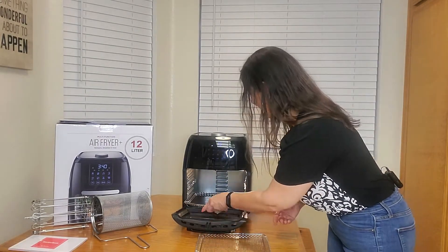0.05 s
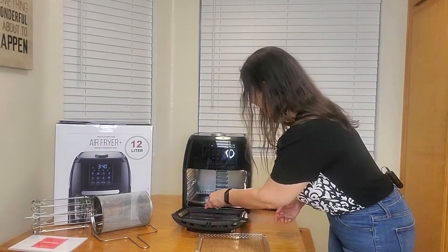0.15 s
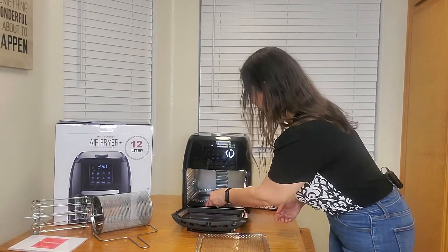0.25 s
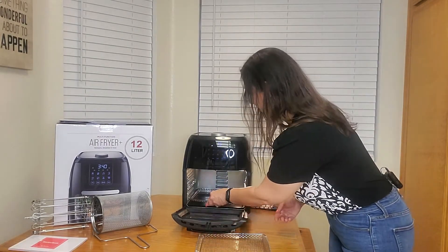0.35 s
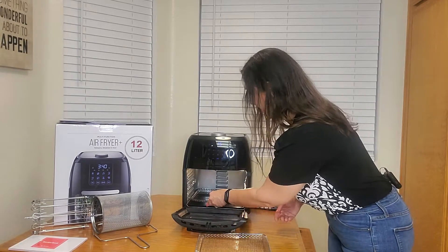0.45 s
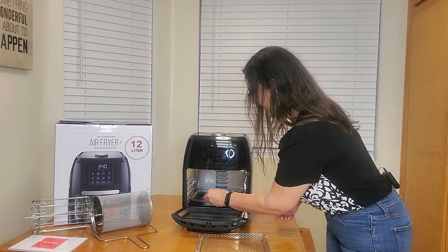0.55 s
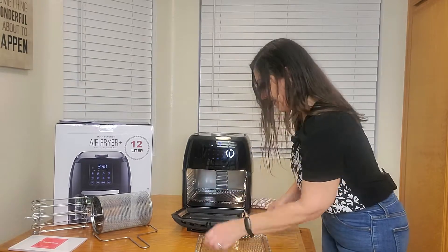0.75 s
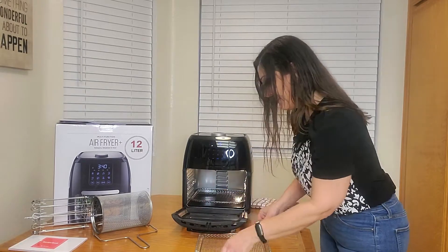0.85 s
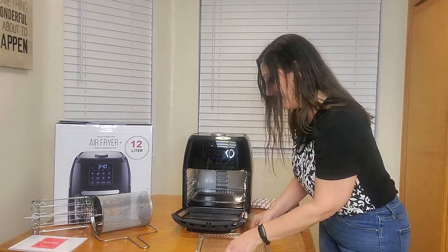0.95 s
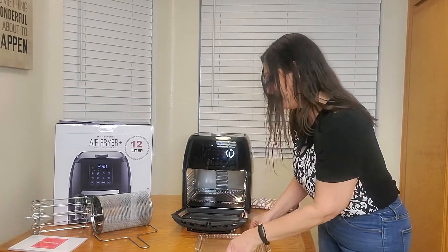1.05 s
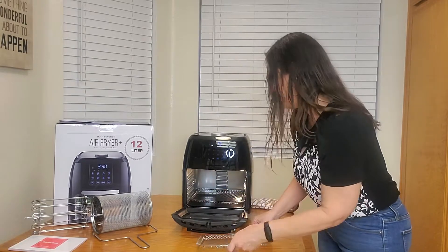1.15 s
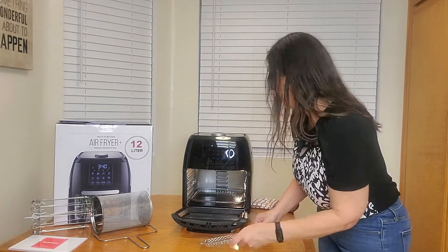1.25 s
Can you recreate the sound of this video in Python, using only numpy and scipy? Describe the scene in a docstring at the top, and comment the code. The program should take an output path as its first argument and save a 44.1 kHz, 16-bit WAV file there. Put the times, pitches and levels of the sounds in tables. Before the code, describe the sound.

A wire rack scrapes and ticks along the rails of a countertop oven, hits the back with a loud metallic bang, and settles; then a second rack bumps quietly on a wooden table in a lively kitchen.

```python
"""A wire mesh rack scrapes along the rails of a small countertop oven, bangs against the back and settles.
A second rack is then nudged and dragged over a wooden table. Uneven stick-slip clicks and single blows
excite the resonances of oven, wires and table; groans are unsteady sines.
A lively kitchen rings on over a faint mains hum and a noise floor."""
import sys
import numpy as np
from scipy import signal
from scipy.fft import rfft, irfft
from scipy.io import wavfile

SR = 44100
rng = np.random.default_rng(int(sys.argv[2]) if len(sys.argv) > 2 else 0)


def int16_out(signal):
    """Quantize to a 16-bit WAV file."""
    q = np.round(np.clip(np.atleast_2d(signal).T, -1, 1) * 32767)
    wavfile.write(sys.argv[1], SR, q.astype(np.int16))


N = 57330

# separate modes of the oven cavity and shell: (frequency [Hz], level [dB], T60 [s])
OVEN_MODES = [(194, 3.5, 0.068), (341, -2.5, 0.11), (378.8, -6, 0.21), (455, -1, 0.13), (547, -3, 0.13),
              (625, -19, 0.68), (639.7, 6, 0.098), (784.5, -5, 0.28), (924, -8, 0.14), (1017, -0.5, 0.069),
              (1219, -9.5, 0.074)]
# separate modes of the rack wires: (frequency [Hz], level [dB], T60 [s])
WIRE_MODES = [(1256, 5, 0.21), (1524, -3, 0.2), (1755, 3, 0.15), (2146, -2.5, 0.16), (2480, 0, 0.047),
              (3358, 0.5, 0.034), (4170, 4.5, 0.07), (4266, 6.5, 0.039), (4980, 1.5, 0.12)]
# spectrum of the oven shell's dense resonances: (frequency [Hz], level [dB])
SHELL_SPECTRUM = [(80, -22.5), (120, 6.5), (180, 9.5), (320, 0.5), (620, 2.5), (850, 2.5), (1300, -11.5),
                  (5000, -43)]
SHELL_T60_S = 0.02


def amp(db):
    """Amplitude factor of a level in dB."""
    return 10 ** (np.asarray(db) / 20)


def unit(h):
    """An impulse response scaled to unit energy."""
    return h / np.sqrt(np.sum(h ** 2))


def through(x, h):
    """Sound x rung through the response h."""
    return signal.fftconvolve(x, h)[:N]


def colour(x, points):
    """Causal filter with the spectral shape of (Hz, dB) points; its overall gain is arbitrary."""
    hz, db = np.array(points).T
    f = np.maximum(np.fft.rfftfreq(N, 1 / SR), 1)
    log_gain = np.log(amp(np.interp(np.log(f), np.log(hz), db)))
    cepstrum = irfft(log_gain, N)
    response = np.exp(2 * rfft(cepstrum[:N // 2], N))  # causal half only: minimum phase
    return irfft(rfft(x) * response, N)


def noise(points):
    """Coloured noise of rms 1."""
    y = colour(rng.standard_normal(N), points)
    return y / y.std()


def fade(t60_s):
    """Exponential decay by 60 dB in t60_s."""
    return np.exp(-np.log(1000) * np.arange(N) / SR / max(t60_s, 1e-3))


def modes(mode_table):
    """Ring of a struck object's separate modes; neighbours swing in opposite directions."""
    t = np.arange(N) / SR
    ring = np.zeros(N)
    for k, (hz, db, t60_s) in enumerate(mode_table):
        ring += (-1) ** k * amp(db) * fade(t60_s) * np.sin(2 * np.pi * hz * t)
    return unit(ring)


def burst(points, t60_s):
    """Short ring of many close resonances: decaying coloured noise."""
    return unit(colour(rng.standard_normal(N) * fade(t60_s), points))


def push(at_s, db, contact_ms=0):
    """One contact force pulse; a longer one is duller."""
    x = np.zeros(N)
    x[int(max(at_s, 0) * SR)] = amp(db)
    pulse = np.hanning(int(abs(contact_ms) * SR / 1000) + 3)
    return through(x, pulse / pulse.sum())


def slips(curve, per_s, scatter_db, column):
    """Uneven stick-slip clicks whose level follows one column of a curve, silent outside it."""
    rows = np.array(curve).T
    gap = 2 * rng.random(N // 4)  # mean 1
    size = np.clip(rng.standard_normal(N // 4), -2, 2)
    sign = rng.choice([-1, 1], N // 4)
    at = (np.cumsum(gap) * SR / per_s).astype(int)
    inside = at < N
    x = np.zeros(N)
    x[at[inside]] = (amp(scatter_db * size) * sign)[inside]
    level_db = np.interp(np.arange(N) / SR, rows[0], rows[column], left=-np.inf, right=-np.inf)
    return x / x.std() * amp(level_db)


def sliding(count=11):
    """The rack judders against the oven's body while wires of differing pitch scrape the rail in turn."""
    # rack sliding in: (time [s], oven body level [dB], wire scrape level [dB])
    slide = [(0.0, -26.5, -35), (0.063, -41.5, -50), (0.082, -32.5, -40.5), (0.094, -33.5, -37),
             (0.15, -36, -40), (0.199, -34.5, -37), (0.206, -38.5, -28.5), (0.237, -36, -26),
             (0.263, -28.5, -35), (0.306, -27.5, -35.5), (0.322, -23, -33), (0.342, -32.5, -47),
             (0.35, -26, -34), (0.382, -29.5, -42), (0.396, -30, -37)]
    # spectrum of the mesh's dense resonances: (frequency [Hz], level [dB])
    mesh_spectrum = [(400, -9), (1100, 6), (2000, 1.5), (4400, -2), (6400, -11.5), (7800, -10),
                     (12000, -22), (15500, -39.5)]
    judders_per_s, scrapes_per_s = 600, 1100
    wire_spread = 0.03  # pitch, +- fraction
    t, cavity, out = np.arange(N) / SR, modes(OVEN_MODES), 0
    passes_s, step_s = np.linspace(0, slide[-1][0], count, retstep=True)
    stretches = 1 + wire_spread * rng.uniform(-1, 1, count)
    for at_s, stretch in zip(passes_s, stretches):
        touch = np.sqrt(np.clip(1 - np.abs(t - at_s) / step_s, 0, 1))  # crossfade between wires
        body = unit(cavity + amp(7.5) * burst(SHELL_SPECTRUM, SHELL_T60_S))
        stretched = [(hz * stretch, db, t60_s) for hz, db, t60_s in WIRE_MODES]
        wire = unit(burst(mesh_spectrum, t60_s=0.032) + amp(-5) * modes(stretched))
        judder = slips(slide, judders_per_s, scatter_db=0 + 1.0, column=1)
        scrape = slips(slide, scrapes_per_s, scatter_db=0.0, column=2)
        out = out + through(touch * judder, body) + through(touch * scrape, wire)
    return out


def bang():
    """The rack knocks over the rails, hits the back and bounces: metal crack, ringing wires, oven boom."""
    # knocks on the rails, then the back: (time [s], body level [dB], crack level [dB], body contact [ms])
    blows = [(.312, 0.5, -10.5, .6), (.3215, 2, -12, 0.87), (0.4073, 12, 9.5, 0.29), (.4100, 18.5, 5, 0.93),
             (0.4175, 6.5, -2.5, 0.82)]
    # spectrum of the metal crack: (frequency [Hz], level [dB])
    crack_spectrum = [(150, -10.5), (700, 8), (1400, 2.5), (2000, -2.5), (3000, -4), (5500, -8),
                      (11000, -14), (15500, -28.5)]
    out = 0
    for at_s, body_db, crack_db, contact_ms in blows:
        body = modes(OVEN_MODES) + amp(-4) * burst(SHELL_SPECTRUM, SHELL_T60_S)
        crack = burst(crack_spectrum, t60_s=0.075) + amp(-12.5) * modes(WIRE_MODES)
        out = out + through(push(at_s, body_db, contact_ms), body) + through(push(at_s, crack_db), crack)
    return out


def catches():
    """Single wires catch, snap free and ring."""
    # wires catching: (time [s], level [dB])
    ticks = [(.002, -14.5), (0.092, -17), (.115, -12), (0.175, -9), (0.2075, -9), (0.214, -6.5),
             (.232, -12), (0.258, -6.5), (.27, -8.5), (.364, -13), (0.574, -36), (0.734, -51), (.925, -49),
             (1.025, -43)]
    # spectrum of one tick: (frequency [Hz], level [dB])
    tick_spectrum = [(500, -22.5), (1300, -3.5), (4500, 4), (6400, -6), (8000, -4), (12000, -12),
                     (15500, -24.5)]
    out = 0
    for at_s, db in ticks:
        ring = burst(tick_spectrum, t60_s=0.043) + amp(-17.0) * modes(WIRE_MODES)
        out = out + through(push(at_s, db), ring)
    return out


def groans():
    """Stick-slip locks on to a resonance: brief groans and squeaks, unsteady in pitch and strength."""
    # resonances of rack and support: (start [s], length [s], pitch [Hz], level [dB])
    locked = [(0.0, 0.029, 350, -33), (0.068, 0.032, 471.8, -33), (0.123, 0.058, 468, -34),
              (0.162, 0.03, 2570, -42), (0.202, .035, 1051, -34.5), (0.257, 0.058, 459, -24.5),
              (0.24, 0.035, 821.4, -31.5), (0.362, 0.032, 830, -28), (1.024, 0.056, 287, -42),
              (1.152, 0.03, 307.2, -32), (1.184, 0.03, 311.4, -29.5), (1.22, 0.021, 317.5, -35),
              (1.253, 0.069, 458.2, -34.5), (1.27, 0.048, 350.7, -29), (1.253, 0.024, 3190, -63)]
    # spectrum of the unsteadiness: (frequency [Hz], level [dB])
    waver_spectrum = [(60, 0), (160, -20), (400, -90)]
    wander, shake_db, edge_s = 0.017, 2, 0.007  # rms pitch fraction, rms level, fade length
    t, out = np.arange(N) / SR, 0
    for at_s, length_s, hz, db in locked:
        pitch_hz = hz * (1 + wander * noise(waver_spectrum))
        phase = 2 * np.pi * np.cumsum(pitch_hz) / SR
        edge = np.clip(np.minimum(t - at_s, at_s + length_s - t) / edge_s, 0, 1)
        swell = np.sin(np.pi / 2 * edge) ** 2 * amp(shake_db * noise(waver_spectrum))
        out = out + np.sqrt(2) * amp(db) * swell * np.sin(phase)
    return out


def settling():
    """Let go, the rack shifts dully and its thinnest wires sing on."""
    # rack shifting: (time [s], body level [dB])
    settle = [(.562, -37.5), (.58, -35.5), (.615, -36.5), (.655, -41.5), (.675, -54.5)]
    # spectrum of the dull shift: (frequency [Hz], level [dB])
    shift_spectrum = [(100, -11.5), (290, 10), (500, -3.5), (1200, -7.5), (1900, -30.5), (5500, -37.5),
                      (12000, -61)]
    # thin wires left ringing: (frequency [Hz], level [dB], T60 [s])
    thin_wire_modes = [(6135, 12, 0.42), (8700, 7, .3)]
    shift = slips(settle, per_s=670, scatter_db=-2.0, column=1)
    body = amp(-7.5) * modes(OVEN_MODES) + burst(shift_spectrum, t60_s=0.045)
    return through(shift, body + amp(-37.5) * modes(thin_wire_modes))


def table_drag():
    """The second rack bumps and judders over the wood, its mesh rasping."""
    # rack dragged over the table: (time [s], table top level [dB], mesh rasp level [dB])
    drag = [(.975, -61.5, -95), (1.02, -44.5, -72.5), (1.05, -53.5, -53.5), (1.075, -49, -51.5),
            (1.11, -56, -48.5), (1.14, -43.5, -65.5), (1.19, -41, -67), (1.235, -36, -59),
            (1.265, -34, -53), (1.3, -39, -45.5)]
    # bumps on the table: (time [s], level [dB], contact [ms])
    bumps = [(.979, -15, 2.1), (1.011, -19, 1.2), (1.032, -6.5, 1.1), (1.043, -17.5, 1.2),
             (1.106, -17, 0.47), (1.242, -16.5, 1.5), (1.254, -4.5, 0.8)]
    # table top modes: (frequency [Hz], level [dB], T60 [s])
    table_modes = [(190, 2, 0.054), (319, 14.5, 0.093), (376.5, 10.5, 0.09), (467, 15.5, 0.069),
                   (514, 8, 0.12), (595, 13, 0.074), (653, 6.5, 0.07), (756, 5.5, 0.08), (1720, 12, 0.0027)]
    # spectrum of the mesh rasp: (frequency [Hz], level [dB])
    rasp_spectrum = [(300, 1), (750, 13.5), (1100, 0.5), (1900, -2), (2400, 0.5), (3500, -5.5),
                     (4000, -16.5), (15000, -36.5)]
    force = sum(push(*row) for row in bumps) + slips(drag, per_s=900, scatter_db=6.0, column=1)
    rasp = slips(drag, per_s=2200, scatter_db=4.5, column=2)
    rasp_response = unit(colour(push(0, 0), rasp_spectrum))
    return through(force, modes(table_modes)) + through(rasp, rasp_response)


def kitchen(x):
    """Direct sound plus a diffuse tail whose highest treble dies first."""
    # reverberation by band: (frequency [Hz], T60 [s])
    room_t60 = [(300, 0.36), (3000, 0.37), (8000, 0.26), (15000, 0.22)]
    tail_db, gap_s = -6.5, 0.0021  # tail re direct sound, delay before it
    hz, t60_s = np.array(room_t60).T
    log_f = np.log(np.maximum(np.fft.rfftfreq(N, 1 / SR), 1))
    white = rfft(rng.standard_normal(N))
    tail = np.zeros(N)
    for band, band_t60_s in zip(np.eye(len(hz)), t60_s):
        weight = np.interp(log_f, np.log(hz), band)  # overlapping bands that add to 1
        tail += irfft(white * weight, N) * fade(band_t60_s)
    tail = unit(tail * (np.arange(N) > gap_s * SR))
    return (x + amp(tail_db) * through(x, tail)) / np.hypot(1, amp(tail_db))


def mains_hum():
    """A steady sine near the mains frequency."""
    hum_hz, rms_db = 59.5, -52.5
    return np.sqrt(2) * amp(rms_db) * np.sin(2 * np.pi * hum_hz * np.arange(N) / SR)


def noise_floor():
    """Steady, low-pitched coloured noise."""
    # spectrum of the floor: (frequency [Hz], level [dB])
    floor_spectrum = [(20, -19), (55, 1), (90, -9), (175, 5.5), (250, -12.5), (600, -25), (1200, -40.5),
                      (15000, -55.5)]
    return amp(-49.5) * noise(floor_spectrum)


def scene():
    """Both racks in the kitchen; such small bodies radiate little bass."""
    racks = sliding() + bang() + catches() + groans() + settling() + table_drag()
    radiation = signal.butter(4, 130, "high", fs=SR, output="sos")  # Hz
    racks = signal.sosfilt(radiation, racks)
    return (kitchen(racks) + mains_hum() + noise_floor())[None]


def record(dry):
    """Peaks stop at full scale, then the top is cut above 15.3 kHz."""
    top_cut = signal.ellip(8, 0.2, 70, 15300, fs=SR, output="sos")
    return signal.sosfilt(top_cut, np.clip(dry, -1, 1))


dry = scene()
out = record(dry)
int16_out(out)
```